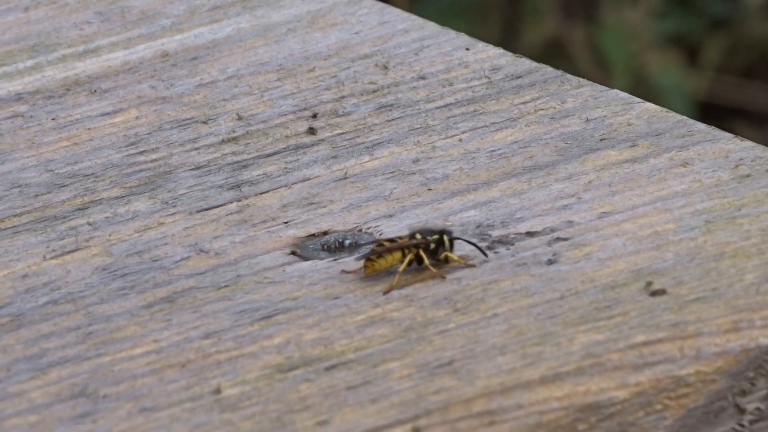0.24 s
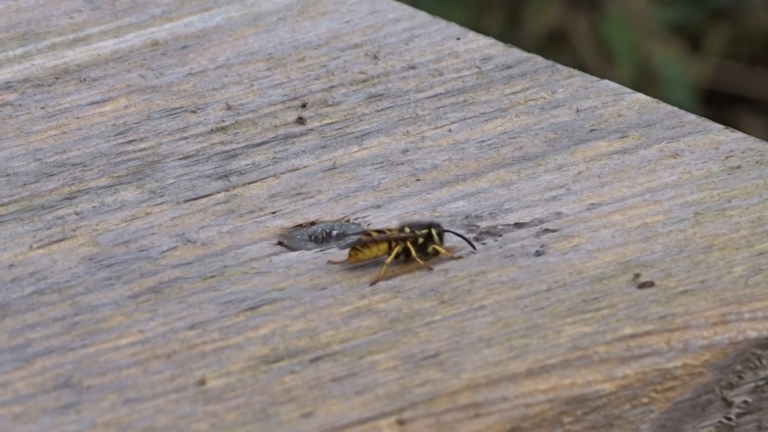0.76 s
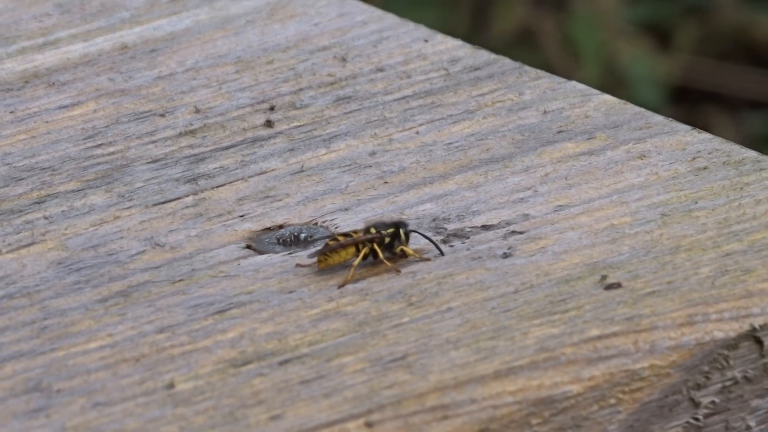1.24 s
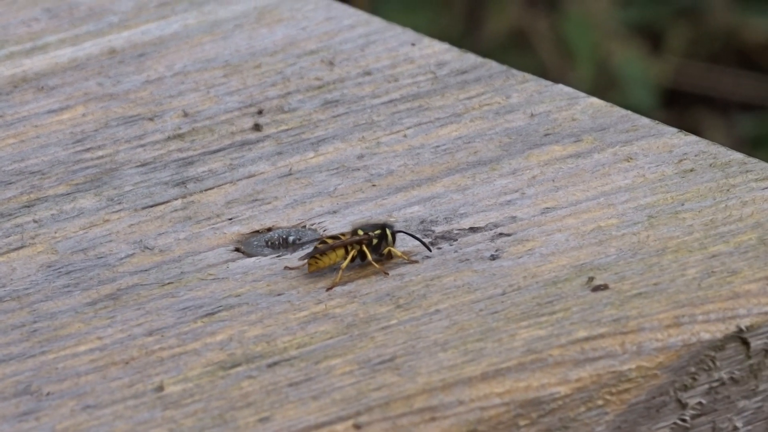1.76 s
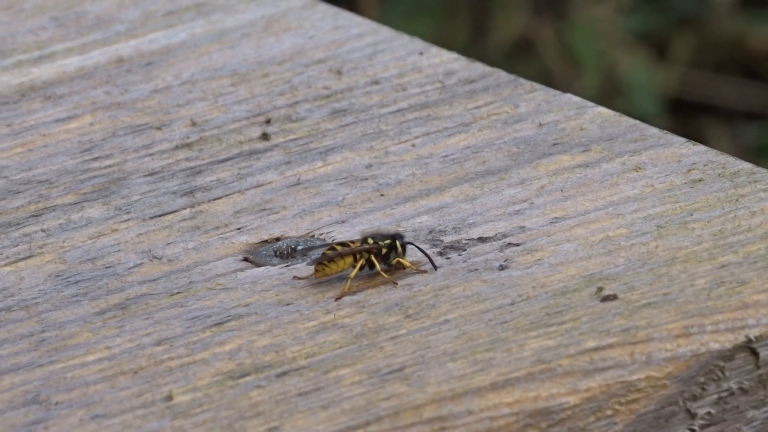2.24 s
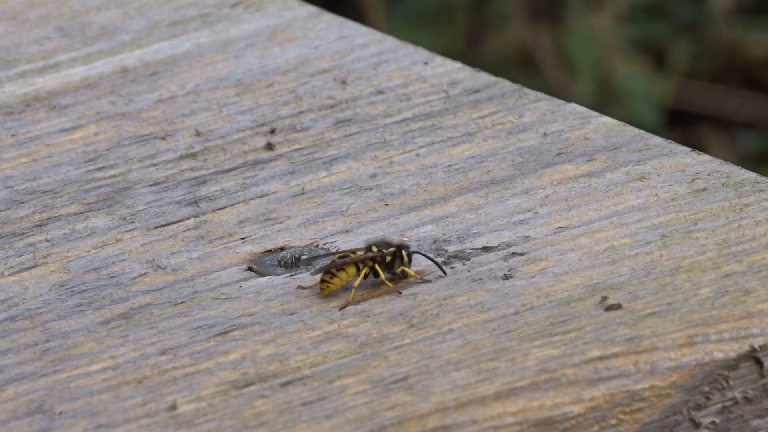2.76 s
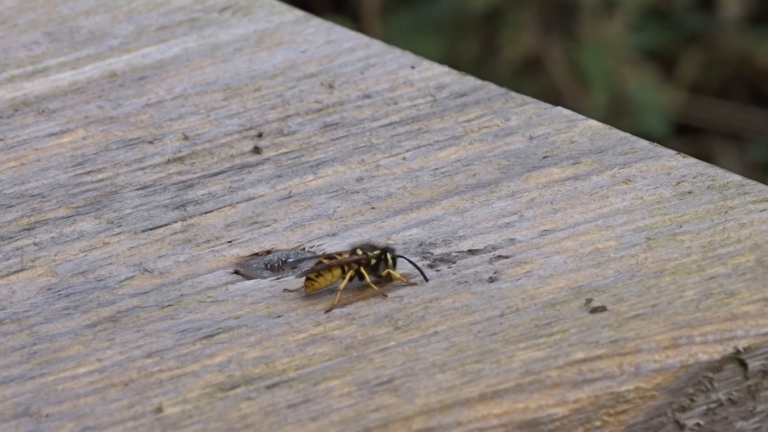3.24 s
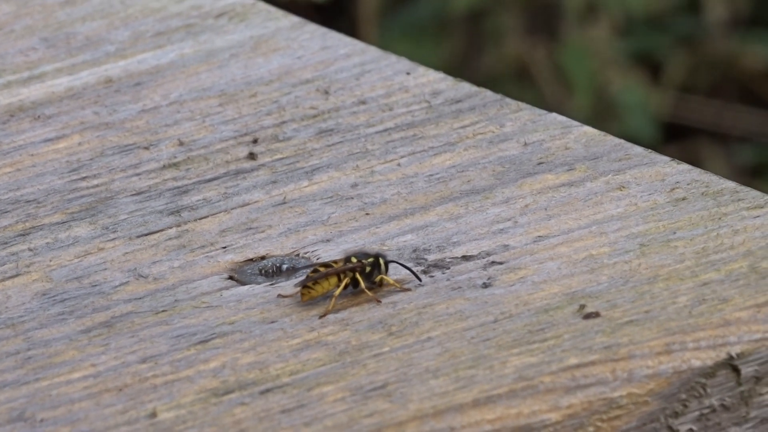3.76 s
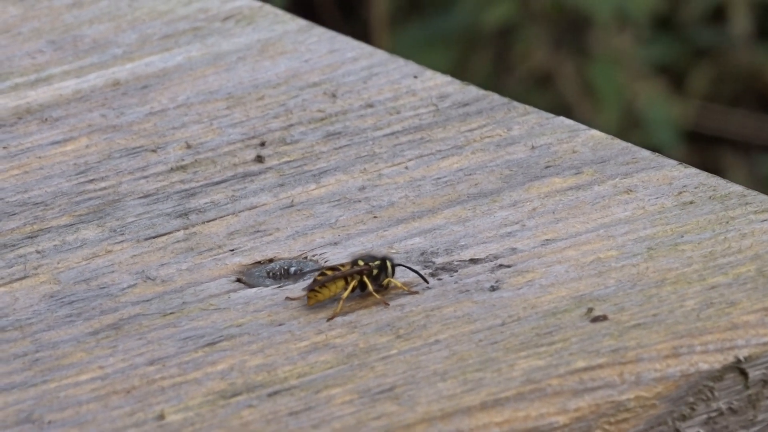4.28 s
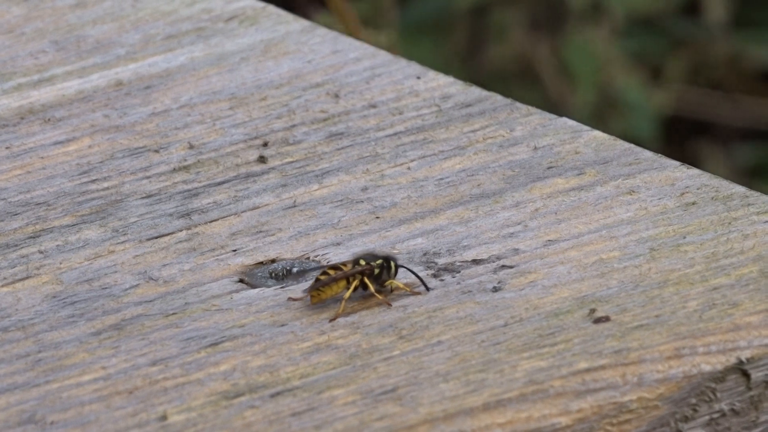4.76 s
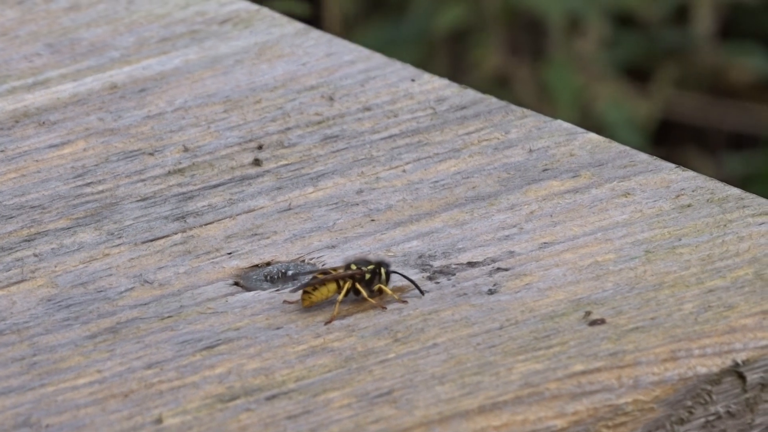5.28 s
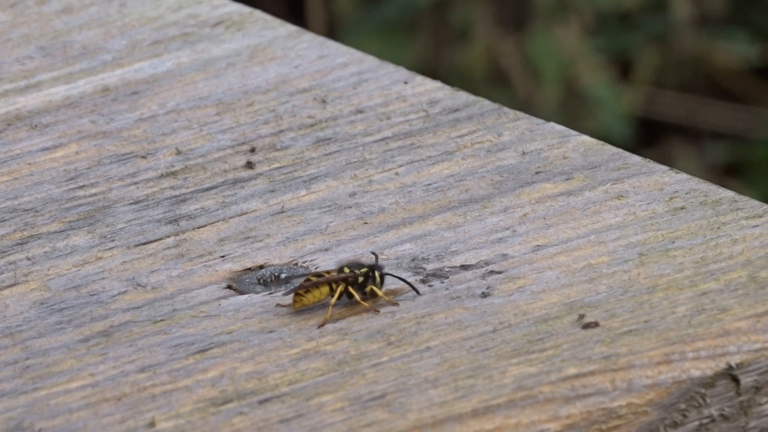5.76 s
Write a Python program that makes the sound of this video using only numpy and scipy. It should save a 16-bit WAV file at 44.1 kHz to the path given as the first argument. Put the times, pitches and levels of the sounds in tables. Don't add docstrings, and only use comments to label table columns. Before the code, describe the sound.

A quiet open-country ambience, about six seconds long, in stereo. From the start a deep, distant diesel drone wavers over a dull town rumble, while tyre roar from a road to one side is strongest in the first two seconds, then recedes in waves. A very high, thin bush-cricket rasp and soft leaf hiss run throughout. Small birds give faint, short, high chips, at the very start, around 1.2, 2.1, 3.8, 4.6, 5.2 and 5.9 seconds. The wasp on the wood is barely heard: tiny dry ticks near 0.4, 1.15 (clearest), 1.75 and 3.9 seconds. The engine climbs slightly in pitch from about 2.5 seconds, is fullest near 4.5, then eases off. Light wind presses on the microphone, with a soft bump near 3.9 and stronger low thumps clustered at 4.5-4.8 and 5.1-5.3 seconds, uneven between left and right, before settling.

```python
import sys
import numpy as np
from scipy import signal
from scipy.fft import rfft, irfft, next_fast_len
from scipy.io import wavfile
from scipy.ndimage import uniform_filter1d

SR = 44100
rng = np.random.default_rng(int(sys.argv[2]) if len(sys.argv) > 2 else 0)


def invert_db(level):
    return 10 ** (np.asarray(level, dtype=float) / 20)


def file_out(sig):
    cols = np.atleast_2d(sig).T
    lim = np.clip(cols, -1, 1)
    pcm = np.round(lim * 32767).astype(np.int16)
    wavfile.write(sys.argv[1], SR, pcm)


N = 265349
SIZE = next_fast_len(N)
SECONDS = np.arange(N) / SR
SIDES = np.array([[1], [-1]])

# centre in seconds, pitch in Hz, left peak in dB, right peak in dB,
# length in cycles.
PUFFS = [(0.474, 90, -35, -35, 2.1), (.8, 40, -26, -45, 1.7), (3.94, 90, -32, -28, 2),
         (4.534, 123, -27.5, -25, 1.6), (4.637, 55, -29, -24, 1.4), (4.649, 246, -28, -41, 1.2),
         (4.717, 66, -21, -21.5, 1.6), (4.716, 150, -42, -25, 1.42), (4.772, 89.9, -17.5, -35, 1.0),
         (4.789, 139.4, -28, -45, 1.5), (4.799, 149, -24, -35, 1.3), (5.102, 109.8, -29, -28, 1.33),
         (5.126, 161, -17.5, -24, 1.95), (5.16, 130, -24.5, -23, 1.15), (5.244, 114, -21, -25, 1.16),
         (5.246, 260, -28, -32, 0.69), (5.265, 148.7, -25, -25, 1.1), (5.801, 110, -37, -34, 2.2),
         (4.615, 95, -42, -25, 1.3), (5.068, 80, -33, -42, 1.4), (5.247, 110, -28, -28, 1.3)]


def curves(table):
    s, *columns = np.transpose(table)
    return [np.interp(SECONDS, s, c) for c in columns]


def shape(table, outside=None):
    hz, value = np.transpose(table)
    bins_hz = np.arange(SIZE // 2 + 1) * SR / SIZE
    return np.interp(np.log(bins_hz + 1), np.log(hz + 1), value, outside, outside)


def through(x, gain):
    return irfft(rfft(x, SIZE) * gain, SIZE)[..., :N]


def coloured(x, table):
    y = through(x, invert_db(shape(table, -140)))
    return y / np.sqrt(np.mean(y ** 2))


def band(x, lo_hz, hi_hz):
    return through(x, shape([(lo_hz, 0), (hi_hz, 1)]))


def wide(side_db):
    mid, side = rng.standard_normal((2, N))
    return mid + invert_db(side_db) * side * SIDES


def walk(rate):
    k = int(SR / rate)
    held = rng.standard_normal(256)[np.arange(N) // k % 256]
    return 1.215 * uniform_filter1d(uniform_filter1d(held, k), k)


def bell(s, length):
    return np.exp(-2 * (2 * (SECONDS - s) / length) ** 2)


def blip(s, hz, length, glide_hz, turn):
    i = np.arange(max(int((s - length) * SR), 0), min(int((s + length) * SR), N))
    t = i / SR - s
    cycles = hz * t + glide_hz * t * t / 2 / length
    return i, np.exp(-2 * (2 * t / length) ** 2) * np.sin(2 * np.pi * (turn + cycles))


def swell(db, flicker_db, rate):
    return invert_db(db - np.mean(db) + flicker_db * walk(rate))


def patchy(x, depth_db, span_hz, span_s):
    hz, s, cells = signal.stft(x, SR, nperseg=1024)
    field = rng.standard_normal(cells.shape[1:])
    field = uniform_filter1d(field, max(int(span_hz / hz[1]), 1), axis=0)
    field = uniform_filter1d(field, max(int(span_s / s[1]), 1), axis=1)
    return signal.istft(cells * invert_db(depth_db * field / field.std()), SR, nperseg=1024)[1][:, :N]


def town_rumble():
    # start in seconds, level in dB.
    town_levels = [(0, -50), (.7, -49), (2.0, -52), (2.5, -48), (3.1, -48.5), (3.8, -45.5), (4.2, -52),
                   (4.8, -51), (5.15, -47.5), (5.35, -49.5), (5.65, -44), (6.02, -46)]
    # frequency in Hz, level in dB per Hz.
    rumble_colour = [(15, -19), (30, -0.5), (80, -2.5), (150, -7), (230, -5.5), (330, -10.5), (450, -15.5),
                     (700, -34)]
    mid, side = rng.standard_normal((2, N))
    both_ports = mid + invert_db(-10.5) * band(side, 70, 200) * SIDES
    return invert_db(curves(town_levels)[0] + 0.72 * walk(4.5)) * coloured(both_ports, rumble_colour)


def road():
    # start in seconds, roar in dB, brightness in dB.
    traffic = [(0, -44.5, -0.5), (.35, -44.5, -1), (.85, -42.5, -1.5), (1.2, -46, 2.5), (1.45, -43, 2.5),
               (1.7, -44, 3.5), (2.2, -49, 0.5), (2.6, -46, -1), (3.3, -48, 1.5), (4.05, -49, -0.5),
               (4.4, -50.5, 1), (4.95, -49, -1.5), (5.45, -51, 0), (5.8, -48, -2.5), (6.02, -49.5, -1.5)]
    # frequency in Hz, level in dB per Hz.
    road_colour = [(250, -23), (400, -8.5), (600, -3), (800, -1), (980, -1), (1250, -3.5), (1600, -8),
                   (2000, -13.5), (2700, -19), (3400, -32.5), (4500, -57)]
    # frequency in Hz, lead of the left port in radians.
    port_lead = [(0, 0.057), (520, 0.63), (1030, 0.52), (2840, 0.21), (5250, 0.0), (8700, -0.1),
                 (10100, 0.3), (12100, 0.0), (16700, 0.1)]
    # centre in seconds, length in seconds, lift in dB.
    lorries = [(.1, .4, 2.5), (1.164, 0.34, 1.5), (2.05, .5, 2.5), (4.35, 0.45, 3.5), (4.95, 0.19, 2),
               (5.57, 0.22, 3.5)]
    roar_db, brightness_db = curves(traffic)
    dull_db = 0.12 * roar_db + sum(db * bell(s, 2 * length) for s, length, db in lorries)
    bright_db = 0.69 * roar_db + brightness_db
    roar = coloured(through(wide(-12.5), np.exp(.5j * shape(port_lead) * SIDES)), road_colour)
    upper = band(roar, 640, 1000)
    bright = band(roar, 1110, 2100)
    parts = swell(dull_db, 0.46, 5.76) * (roar - upper)
    parts = parts + swell(roar_db, 0.19, 8) * (upper - bright)
    parts = parts + swell(bright_db, 0.44, 9) * bright
    return invert_db(-44.0 - .6 * SIDES) * patchy(parts, 1.32, 150, .15)


def engine_levels():
    # start in seconds, firing rate in Hz, level in dB.
    engine_load = [(0, 54.27, -38.5), (.62, 54.7, -40), (1.1, 54.5, -39.5), (1.5, 55, -38),
                   (1.95, 55.34, -40.5), (2.4, 55.67, -39.5), (2.78, 56.4, -35.5), (3.1, 56.9, -37),
                   (3.79, 59.1, -35), (4.2, 59.5, -34), (4.46, 60.1, -31), (4.85, 60.1, -38),
                   (5.15, 60.17, -35.5), (6.02, 60.2, -42.5)]
    # centre in seconds, length in seconds, sinking of the fundamental in dB, of the second in dB.
    fades = [(1.68, 0.22, -0.5, 12), (2.015, 0.092, 0, 5), (2.123, 0.16, 11, 5.5), (2.558, 0.16, 8.5, 0.1),
             (3.86, 0.069, 8, 1.5), (4.718, 0.042, 6, 1), (5.335, 0.21, 17, 17), (5.58, .15, 15, 6.5),
             (.15, 0.34, 2.5, 3), (.85, 0.23, 2, 1.5), (1.299, 0.097, 2.2, 4.5)]
    hz, first_db = curves(engine_load)
    second_db = -42 + 0.52 * (first_db - first_db[0]) - 1.2 * SECONDS
    for s, length, first_sinks_db, second_sinks_db in fades:
        fade = bell(s, 2 * length)
        first_db = first_db - first_sinks_db * fade
        second_db = second_db - second_sinks_db * fade
    return hz, first_db, second_db


def diesel():
    # multiple of the firing rate, level in dB against the upper orders' reference.
    upper_orders = [(3, -15.5), (4, -25.5), (1.5, -12.5)]
    # centre in seconds, length in seconds, lift in dB.
    upper_swell = (1.5, 1.1, 4)
    hz, first_db, second_db = engine_levels()
    phase = 2 * np.pi * np.cumsum(hz * (1 + 0.012 * walk(25.15))) / SR
    first = invert_db(first_db + 1.1 * walk(14)) * np.sin(phase)
    second_gain = invert_db(second_db + 0.5 + 0.96 * walk(13) + .5 * SIDES)
    out = first + second_gain * np.sin(2 * phase + 0.69 + 0.072 * SIDES)
    swell_s, swell_length, swell_db = upper_swell
    upper_db = -44 - 0.76 * SECONDS + swell_db * bell(swell_s, swell_length)
    for multiple, db in upper_orders:
        out = out + invert_db(upper_db + db + 2.5 * walk(4)) * np.sin(multiple * phase)
    return np.sqrt(2) * out * invert_db(-.1 * SIDES)


def crickets():
    # start in seconds, chorus swell in dB.
    chorus = [(0, 1.5), (.27, 3), (.57, 0), (.82, 0.5), (1.3, -1.5), (2.2, -0.5), (3.1, -1.5), (3.35, 1.5),
              (3.7, -2), (4.2, -1.5), (4.66, 2), (5.3, 1), (5.45, 0), (6.02, -0.5)]
    # frequency in Hz, level in dB per Hz.
    chorus_colour = [(7500, -51), (9500, -21.5), (11500, -11.5), (13500, -8), (14500, -4.5), (15650, 2),
                     (15950, -16), (16050, -60)]
    # wing strokes per second, level in dB.
    singers = [(68, -4), (72.5, -5), (76, 2.5)]
    upper_db = curves(chorus)[0]
    lower_db = 0.48 * upper_db + 0.43 * SECONDS
    mid, side = rng.standard_normal((2, N))
    out = 1.22 * (mid + invert_db(-14.5) * (side - band(side, 15000, 15800)) * SIDES)
    for rate, db in singers:
        stroke = np.cumsum(rate * (1 + 0.00836 * walk(2.96))) / SR % 1
        burst = np.exp(-((stroke - .5) / 0.14) ** 2) * rng.standard_normal(N)
        out += invert_db(db + 2.8 * walk(4.06)) * burst
    buzz = coloured(out, chorus_colour)
    upper = band(buzz, 12500, 17000)
    lower = buzz - upper
    return invert_db(-48.0) * (swell(upper_db, 0.35, 12) * upper + swell(lower_db, 0.44, 16) * lower)


def leaves():
    # start in seconds, swell in dB.
    breeze_swell = [(0, 0.5), (.5, -0.5), (1.2, 0), (2, -1), (3, 0.7), (3.6, 0.3), (4.5, 0.1), (5.2, 0.2),
                    (6.02, -0.4)]
    # frequency in Hz, level in dB per Hz.
    leaf_colour = [(1800, -12), (3000, -0.5), (4000, -3.5), (5300, -4.5), (6200, -2.5), (7600, 0.5),
                   (9000, -3), (11000, -8.5), (14000, -20)]
    # frequency in Hz, level in dB per Hz.
    leaf_side_colour = [(1200, 0), (2200, -3), (3500, -8.5), (4600, -17), (8000, -17), (8600, -9),
                        (11000, -8), (15000, -26)]
    mid_gain = invert_db(-57 + curves(breeze_swell)[0] + .5 * walk(17))
    mid = mid_gain * coloured(rng.standard_normal(N), leaf_colour)
    side = invert_db(-61) * coloured(rng.standard_normal(N), leaf_side_colour)
    return patchy(mid + side * SIDES, 1.08, 700, .2)


def birds():
    # centre in seconds, pitch in Hz, level in dB, length in seconds.
    high_chips = [(.044, 6950, -57, .025), (1.182, 7000, -61.5, .025), (1.2, 7300, -66, .025),
                  (1.322, 6700, -66, .03), (1.593, 6670, -64, .012), (1.821, 6800, -65, .015),
                  (2.133, 6900, -63, .011), (2.142, 6370, -63, .012), (2.57, 6600, -62, .015),
                  (3.238, 5966, -62.5, .015), (3.815, 6500, -56, .022), (4.59, 6237, -58, .017),
                  (4.602, 7000, -63, .01), (4.609, 7500, -63, .01), (4.629, 7330, -63, .014),
                  (5.223, 7100, -63, .015), (5.239, 7000, -63, .02), (5.909, 7054, -61, .021),
                  (5.924, 7250, -61, 0.019)]
    # centre in seconds, pitch in Hz, level in dB,
    # length in seconds.
    low_chips = [(0.77, 4740, -74, .012), (1.718, 4300, -64, .015), (2.298, 4200, -63.5, .015),
                 (2.446, 4560, -70, .014), (2.833, 4214, -65, .012), (2.843, 5440, -64, .016),
                 (2.917, 4790, -70, .011), (3.172, 4220, -69, .012), (3.243, 5144, -68, .012),
                 (3.361, 5085, -65, .012), (3.965, 4760, -65.5, .017), (4.531, 5355, -64, .026),
                 (4.546, 4760, -65, 0.029), (4.574, 4280, -64, .015), (4.67, 4600, -63, .01),
                 (5.425, 4220, -67, .015)]
    out = np.zeros(N)
    rasp = 1 + 0.49 * walk(500)
    for chips, glide_hz_per_s in ((high_chips, 25000), (low_chips, 6500)):
        for s, hz, db, length in chips:
            i, chip = blip(s, hz, length, glide_hz_per_s * length, 0)
            raspy = chip * rasp[i]
            same_energy = np.sqrt(np.sum(chip ** 2) / np.sum(raspy ** 2))
            out[i] += invert_db(db + 7.5) * raspy * same_energy
    lags = np.arange(int(.04 * SR))
    hedge = rng.standard_normal((2, len(lags))) * np.exp(-lags / SR / 0.012) * (lags > .003 * SR)
    return out + invert_db(-28.5) * signal.fftconvolve(out[None], hedge, axes=1)[:, :N]


def breeze_buffet():
    # start in seconds, wind pressure in dB.
    wind_levels = [(0, -43), (.12, -56), (.3, -45), (.5, -50), (.8, -45), (2.0, -47), (2.5, -58),
                   (2.9, -47), (3.4, -57.5), (3.95, -41), (4.45, -46), (4.66, -34), (4.82, -50),
                   (5.05, -42), (5.3, -49), (5.62, -54), (5.85, -40), (6.02, -61)]
    # frequency in Hz, level in dB per Hz.
    buffet_colour = [(12, -12), (30, -2.5), (60, -3), (110, -11.5), (200, -25.5), (400, -47)]
    wind_gain = invert_db(curves(wind_levels)[0] + 3.0 * walk(12))
    return wind_gain * coloured(rng.standard_normal(N), buffet_colour)


def port_turbulence():
    # frequency in Hz, level in dB per Hz.
    port_colour = [(15, -28), (40, -9), (70, -3), (150, -10), (250, -16), (450, -20), (700, -47)]
    wake_s = 0.029
    port = invert_db(-65)
    for s, _, left_db, right_db, _ in PUFFS:
        port = port + invert_db(max(left_db, right_db) - 23.5) * bell(s, 2 * wake_s)
    return port * invert_db(2.5 * walk(25)) * coloured(rng.standard_normal(N), port_colour) * SIDES


def gusts():
    out = np.zeros((2, N))
    for s, hz, left_db, right_db, cycles in PUFFS:
        for port, db in enumerate((left_db, right_db)):
            turn = 0.756 + 0.073 * rng.standard_normal()
            i, puff = blip(s, hz, cycles / hz, 0, turn)
            out[port, i] += invert_db(db) * puff
    return out


def wasp():
    # centre in seconds, pitch in Hz, peak in dB.
    jaw_ticks = [
        (.409, 8030, -52),
        (1.150, 8080, -43),
        (1.756, 6070, -49),
        (3.922, 7930, -54),
    ]
    out = np.zeros(N)
    for s, hz, db in jaw_ticks:
        i, tick = blip(s, hz, 0.0015, 0, 0)
        out[i] += invert_db(db) * tick
    return out


def scene():
    far = town_rumble() + road() + diesel()
    near = crickets() + leaves() + birds()
    wind = breeze_buffet() + port_turbulence() + gusts()
    return far + near + wind + wasp()


def top_cut(x):
    return signal.sosfilt(signal.butter(12, 16000, fs=SR, output="sos"), x)


def record(dry):
    return top_cut(dry)


dry = scene()
out = record(dry)
file_out(out)
```